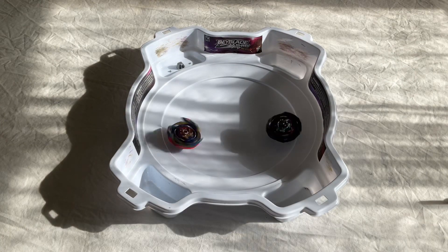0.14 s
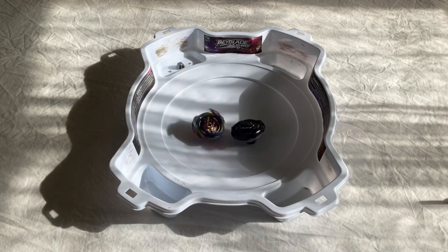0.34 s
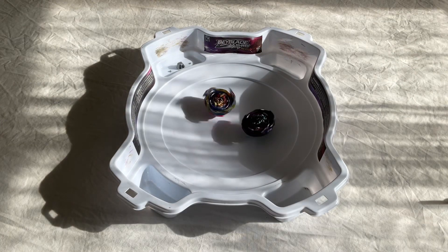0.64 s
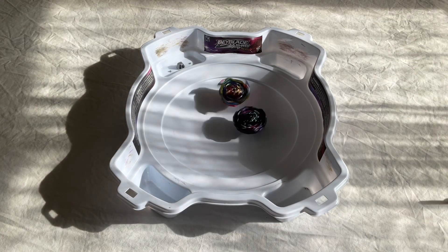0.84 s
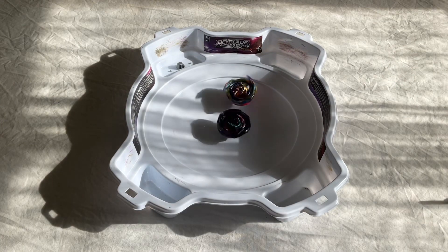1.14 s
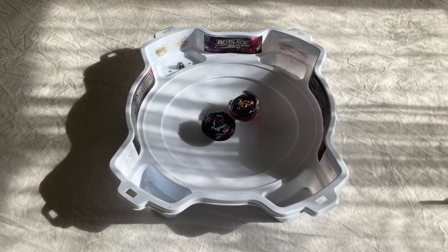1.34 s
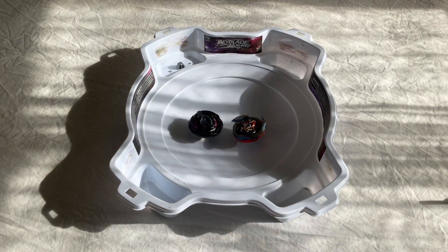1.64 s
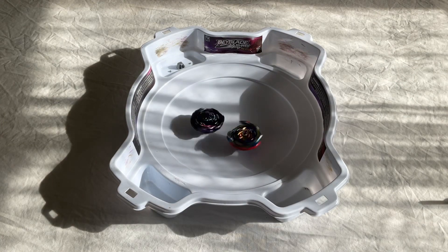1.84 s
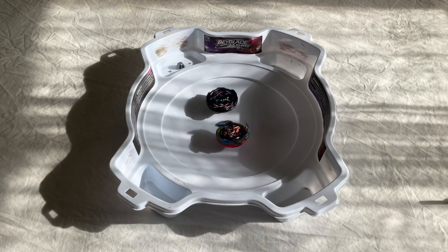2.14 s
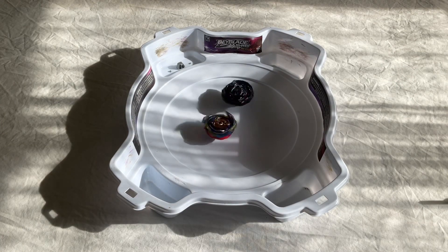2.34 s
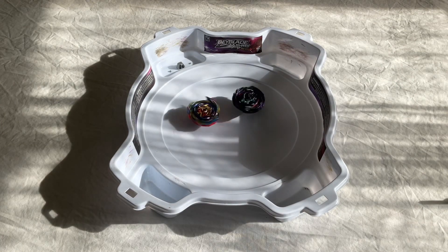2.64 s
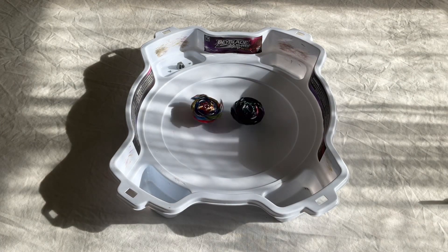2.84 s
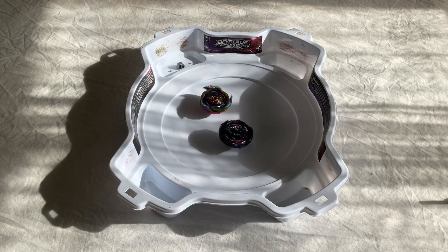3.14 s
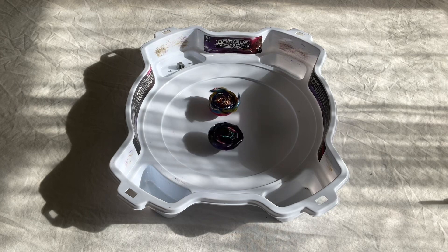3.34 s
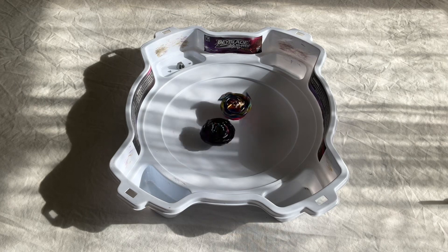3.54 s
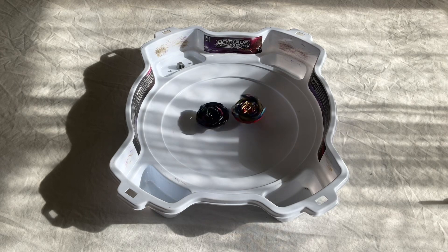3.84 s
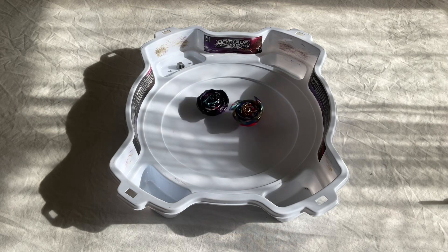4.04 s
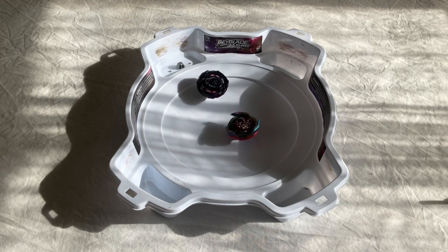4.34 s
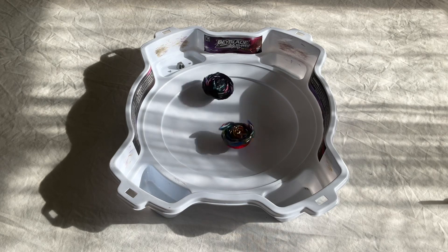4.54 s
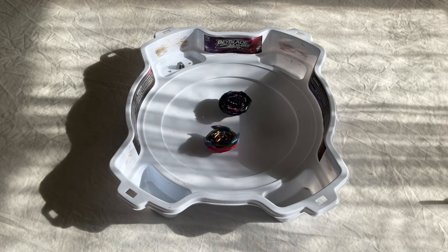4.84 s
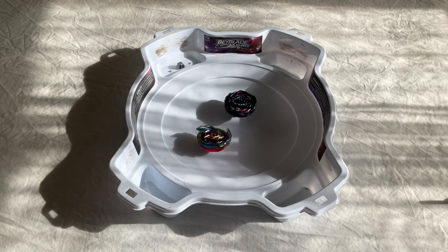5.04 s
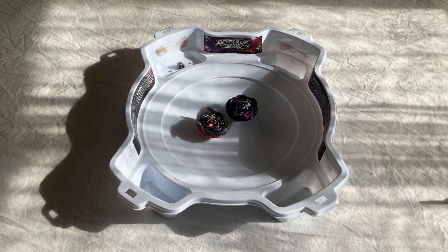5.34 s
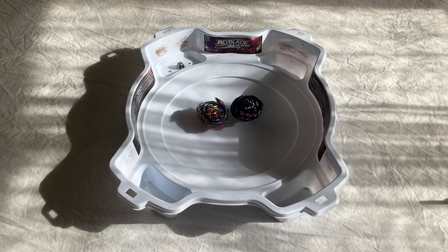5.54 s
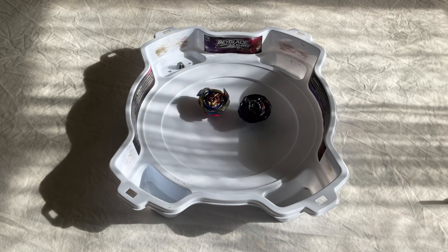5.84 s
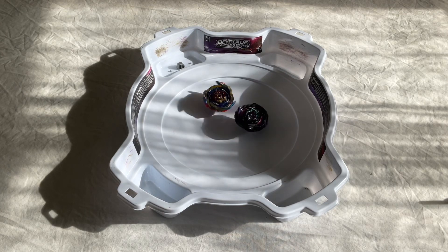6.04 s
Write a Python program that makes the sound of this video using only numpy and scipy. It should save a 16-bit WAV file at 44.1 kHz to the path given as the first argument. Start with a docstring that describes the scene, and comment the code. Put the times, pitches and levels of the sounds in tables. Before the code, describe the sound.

Close up in a small room, two toy tops spin in a thin plastic dish over a soft low rumble and hum. Hard, dry clacks come at irregular intervals, each followed by light knocks and quick rattling that settles into faint ticking. A few tiny squeaks and short scrapes slip between hits, and the loudest crack comes late, before a final cluster of clashes.

```python
"""A small room, close to a thin plastic dish in which two toy tops spin.
Their toothed rims clash in millisecond bursts of noise contacts that set off clacks, rings and dish thumps.
Shaken tops knock, chatter as trains of tiny hops, skid as resonant noise and squeak until they steady again.
Metal weight discs sing on in thin sine tones, and the dish floor booms as a top drops back.
Underneath, the dish rumbles as coloured noise, drones on a wavering low tone and whirrs on a fading one."""
import sys
import numpy as np
from scipy import signal
from scipy.fft import rfft, irfft
from scipy.io import wavfile
from scipy.ndimage import uniform_filter1d

SR = 44100
rng = np.random.default_rng(int(sys.argv[2]) if len(sys.argv) > 2 else 0)


def transcribe(signal):
    """Save signal, clipped to [-1, 1], as a 16-bit WAV file at the path in sys.argv[1]."""
    frames = np.atleast_2d(signal).T
    limited = np.clip(frames, -1, 1)
    pcm = np.round(limited * 32767).astype(np.int16)
    wavfile.write(sys.argv[1], SR, pcm)


N = 273420  # length in samples

# Levels in the tables are relative wherever a layer adds its own gain.
# rims clash: start_s, level_db, treble_db (-10 is neutral), thump_db, hold_ms, clack_hz
CLASHES = [(0.3477,-1.5,-9,-28.5,4.2,2080),(0.8076,-8,-2,-35,2.2,1850),(0.819,-7,-8,-40.5,2.3,3880),(1.262,-11,-4,-41.5,3.6,3080),(2.0129,-7.5,-5,-46,4.4,3320),(2.943,-17,-11,-38,10.4,2512),(2.9577,-7.5,-8,-38,4,2320),(3.9313,-14,-10,-47.5,1.9,3255),(4.184,-7.5,-11.5,-33.5,3.9,2976),(4.7725,0,-10,-29,6.8,3020),(5.3231,-5,-10.5,-27,1.4,2750),(5.3439,-9.5,-7,-37.5,3.8,3260),(5.3871,-10.5,-10,-42,2.4,2544),(5.5844,-8.5,-11.5,-33,2.5,3247),(6.0163,-11.5,-5,-34,3,2500),(6.0263,-8,-8.5,-33,3.2,3240)]
# knocks of a tilted top on the dish or the other top, hard and soft: start_s, level_db, treble_db (-14 is neutral)
KNOCKS = [(0.2039,-29,-27),(0.2744,-18,-13.5),(0.406,-10,-18),(0.5442,-21,-17),(0.6094,-31.5,-14),(0.711,-31.5,-18),(1.2755,-15.5,-18),(1.4076,-28.5,-16.5),(1.8291,-35.5,-25),(1.975,-32,-18),(2.055,-18.5,-18.5),(2.0967,-17.5,-15),(2.1172,-13.5,-17),(2.148,-16.5,-13),(2.1611,-20,-16),(2.2185,-25.5,-23),(2.25,-25,-24),(2.2752,-27,-30),(2.3006,-28,-17),(2.3738,-35,-21.5),(2.8884,-25.5,-20.5),(2.9834,-18.5,-12),(3.0343,-15.5,-19),(3.8834,-27,-14),(3.9832,-16.5,-13.5),(4.4233,-33.5,-17),(4.471,-29,-19),(4.7007,-17.5,-20),(4.7328,-15,-16),(4.7644,-18.5,-12.5),(4.8543,-22,-17),(5.1602,-35,-21.5),(5.6325,-20,-17),(5.8428,-32.5,-18.5),(5.8642,-33,-22),(6.103,-19.5,-14),(6.1267,-18,-12.5)]
# the tops are thrown off balance and chatter, building up to full_level_s:
# full_level_s, level_db, hold_s, rise_s (per 20 dB)
WOBBLES = [(0.3,-36.5,.12,.14),(0.5,-40,.04,.15),(0.81,-44.5,.04,.27),(1.275,-39,.02,.03),(1.835,-60,.07,.01),(2.025,-39,.135,.03),(2.83,-48,.06,.08),(2.96,-39,.075,.04),(3.95,-43,.02,.17),(4.68,-42.5,.07,.27),(5.35,-44,.05,.02),(5.6,-48,.06,.02),(6.04,-41,.16,.1)]
# light ticking of the tips while the tops stand upright: time_s, level_db
TICKING = [(0,-56),(1.2,-57.5),(1.6,-68),(2.4,-66),(3.4,-64.5),(3.72,-58.5),(4.12,-65),(4.5,-58),(5.05,-68.5),(5.85,-62.5)]
# a tip slides across the dish, building up to full_level_s:
# full_level_s, level_db, hold_s, rise_s (per 20 dB), fall_s (per 20 dB)
SLIDES = [(4.258,-34,.06,.065,.08),(4.63,-34,.075,.02,.04)]
# a tip squeaks on the plastic: start_s, level_db
SQUEAKS = [(1.1093, -31.5), (1.1521, -27.5), (3.3532, -42)]
# a metal weight disc is left singing: start_s, pitch_hz, level_db, t60_s
SINGING = [(0.819,5303,-56,0.95),(0.819,4296,-65,1.0),(4.773,8520,-58,.6),(4.773,4517,-64,.7),(5.584,4290,-62,.6)]
# a top drops back and the dish booms: start_s, pitch_hz, level_db
BOOMS = [(0.385,184,-31),(0.425,139,-29),(0.819,725,-29.5),(0.83,188,-35),(2.19,150,-31.5),(2.21,220,-38),(5.598,161,-36),(6.04,148,-40)]
# the tips roll over the dish: time_s, level_db
ROLL = [(0,-43),(1.1,-45),(2.3,-43.8),(3.35,-48),(6.2,-48.8)]
# low drone of the dish: time_s, level_db
DRONE = [(0.0, -50), (1.16, -53), (1.76, -41), (2.5, -45), (2.68, -41), (4.21, -49), (4.28, -56),
         (4.51, -45), (4.73, -52), (4.97, -39), (5.4, -48), (5.97, -42), (6.2, -49)]

# ringing modes of the tops: pitch_hz, level_db, t60_s
TOP_MODES = [(1140,-2,.05),(2048,1.5,.05),(2200,-4.5,0.093),(2540,-3.5,.05),(2900,-5,.06),(2994,-9.5,0.16),(3145,-1.5,0.088),(3420,2.5,0.071),(3508,-5.5,0.17),(3890,-7,.07),(4847,-6.5,.08),(6300,3,.06),(6910,-11.5,.06),(8100,-4,.05),(8550,7.5,.06),(8510,-2,.12)]
# resonances of a sliding tip: pitch_hz, width_hz, level_db
SKID_MODES = [(720, 160, -8), (3020, 200, 3.5), (3290, 130, 2.5), (4430, 220, 3.5), (4830, 260, 6),
              (5080, 200, -3), (8400, 700, -7)]
# spectral colours of clash, knock, chatter, dish thump and rolling: frequency_hz, level_db
CLASH_COLOUR = [(300, -17.5), (900, -12), (1400, -5.5), (2000, -4.5), (3100, 0.5), (4400, -1.5), (5600, -2),
                (7000, 1.5), (8400, 2), (10000, -3), (12500, -10), (16000, -14.5)]
KNOCK_COLOUR = [(150, 2), (500, -3.5), (900, -13), (1300, -3), (2200, -3.5), (3100, 6), (4200, -6.5),
                (6000, -2.5), (8400, -6), (10500, -6.5), (12000, -16), (16000, -18.5)]
CHATTER_COLOUR = [(200,-7),(500,-2.5),(730,-4),(950,-7),(1250,3),(1700,-1.2),(2200,1),(3100,1.5),(4200,-2.5),(5000,-2),(5800,-5.5),(8500,-2.5),(11000,-13),(15500,-21)]
THUMP_COLOUR = [(30,-40.5),(70,-21.5),(140,-3),(220,-1),(340,1.5),(450,-2.5),(560,-7.5),(730,-10),(920,-18),(1250,-16),(1700,-32),(4000,-57)]
ROLL_COLOUR = [(25,-50),(38,-24),(55,-7),(100,5.5),(140,-2),(220,-2),(340,-4.5),(450,-10.5),(700,-15),(1000,-20),(2000,-27),(4000,-42),(8000,-44),(15000,-68)]

SETTLE_S = 0.17  # a wobble dies away by 20 dB in this time
WHIRR_HZ, WHIRR_DB, WHIRR_FADE_DB_PER_S = 344, -45, 6
DRONE_HZ = 76.2
ROLL_CHATTER_SHARE = 0.1  # dB of extra rumble per dB of chatter
ROOM_T60_S, ROOM_TREBLE_T60_S = 0.17, 0.2
LOW_CUT_HZ, TOP_HZ = 42, 15800


def undb(db):
    """Decibels to gain."""
    return 10 ** (np.asarray(db) / 20)


def unit(x):
    """Scale to rms 1."""
    return x / np.sqrt(np.mean(x ** 2))


def unit_energy(x):
    """Scale to energy 1."""
    return x / np.sqrt(np.sum(x ** 2))


def curves(table):
    """The columns of a timed table, one value a sample."""
    s, *columns = np.transpose(table)
    return [np.interp(np.arange(N) / SR, s, column) for column in columns]


def seconds(length):
    """A time axis in seconds."""
    return np.arange(int(length * SR)) / SR


def add(track, s, sound):
    """Mix a sound in at time s."""
    i = max(int(s * SR), 0)
    track[i:i + len(sound)] += sound[:N - i]


def ring(x, response):
    """Drive an impulse response."""
    return signal.fftconvolve(x, response)[:len(x)]


def colour(points, tilt_db=0, size=4096):
    """Minimum-phase response with the given spectrum, tilted by tilt_db an octave above 2 kHz."""
    hz, db = np.transpose(points)
    octave = np.log2(np.maximum(np.arange(size // 2 + 1) * SR / size, 1))
    tilt = tilt_db * np.maximum(octave - np.log2(2000), 0)
    gain = undb(np.interp(octave, np.log2(hz), db) + tilt)
    # folding the cepstrum puts all the energy after the blow
    cepstrum = irfft(np.log(gain))
    cepstrum[1:size // 2] *= 2
    cepstrum[size // 2 + 1:] = 0
    return unit_energy(irfft(np.exp(rfft(cepstrum))))


def walk(rate):
    """Smooth random drift of rms 1, with a fresh value rate times a second."""
    k = int(SR / rate)
    steps = np.repeat(rng.standard_normal(N // k + 1), k)
    return unit(uniform_filter1d(uniform_filter1d(steps, k), k)[:N])


def swell(s, db, hold_s, rise_s, fall_s):
    """Gain that builds up to db at time s, holds and fades; rise and fall are times per 20 dB."""
    t = np.arange(N) / SR - s
    before, after = np.maximum(-t, 0), np.maximum(t - hold_s, 0)
    return undb(db - 20 * (before / rise_s + after / fall_s))


def contact(hold_ms, rise_ms, fall_ms, grain_db):
    """A burst of tiny impacts of uneven strength while two spinning surfaces touch."""
    ms = 1000 * seconds(.1)
    teeth = rng.standard_normal(len(ms)) * undb(grain_db * rng.standard_normal(len(ms)))
    attack = np.minimum(ms / rise_ms, 1)
    release = np.exp(-np.maximum(ms - hold_ms, 0) / fall_ms)
    return unit_energy(teeth * attack * release)


def mode(hz, t60):
    """One damped resonance: a sine that decays from envelope height 1."""
    t = seconds(.3)
    return np.sin(2 * np.pi * hz * t) * undb(-60 * t / t60)


def clashes(crack_db=13.0, clack_db=3, clack_t60=0.015, thump_db=27, thump_t60=0.09):
    """Rim teeth rattle across each other, the shell clacks, the tops ring, and the recoil thumps the dish."""
    out, t = np.zeros(N), seconds(.3)
    for s, db, treble_db, dish_db, hold_ms, clack_hz in CLASHES:
        burst = contact(hold_ms, rise_ms=0.61, fall_ms=2.16, grain_db=4.5)
        crack = unit_energy(ring(burst, colour(CLASH_COLOUR, tilt_db=.6 * (treble_db + 10))))
        add(out, s, undb(db + crack_db) * crack)
        clack = unit_energy(ring(burst, mode(clack_hz, clack_t60)))
        add(out, s, undb(db + clack_db) * clack)
        add(out, s + .001, undb(db) * top_ring())
        thump = ring(rng.standard_normal(len(t)) * undb(-60 * t / thump_t60), colour(THUMP_COLOUR))
        add(out, s + .002, undb(dish_db + thump_db) * unit_energy(thump))
    return out


def top_ring():
    """The modes of the tops; each blow lands elsewhere and weights them anew."""
    t = seconds(.7)
    hz, db, t60 = np.transpose(TOP_MODES)[:, :, None]
    weight, phase = rng.standard_normal((2, len(hz), 1))
    tones = np.sin(2 * np.pi * (hz * t + phase))
    # dividing by the root of the decay time sets each level by energy
    modes = tones * undb(db + 2.4 * weight - 60 * t / t60) / np.sqrt(t60)
    return unit_energy(modes.sum(0))


def knocks(chatter_db, knock_db=10, ring_db=-3):
    """Lighter, duller blows of a wobbling top: short noise contacts that also ring the tops."""
    out = np.zeros(N)
    for s, db, treble_db in [*KNOCKS, *stray_knocks(chatter_db)]:
        burst = contact(hold_ms=1.0, rise_ms=0.19, fall_ms=2.8, grain_db=3.0)
        knock = unit_energy(ring(burst, colour(KNOCK_COLOUR, tilt_db=0.642 * (treble_db + 14))))
        add(out, s, undb(db + knock_db) * knock)
        add(out, s, undb(db + ring_db) * top_ring())
    return out


def stray_knocks(chatter_db, rate=4, above_db=15, scatter_db=2.2, most_db=-32,
                 treble_db=-19, treble_scatter_db=4, count=80):
    """Now and then a top tips over far enough to knock lightly, its level following the chatter."""
    place, size, bright = rng.standard_normal((count, 3)).T
    times = (np.arange(count) + .5 + .3 * place) / rate
    chatter_then_db = np.interp(times * SR, np.arange(N), chatter_db)
    db = np.minimum(chatter_then_db + above_db, most_db) + scatter_db * size  # capped, then scattered
    return np.c_[times, db, treble_db + treble_scatter_db * bright][times < N / SR]


def unrest():
    """How hard the tips chatter, in dB: the powers of upright ticking and every wobble add up."""
    (upright_db,) = curves(TICKING)
    power = undb(upright_db) ** 2 + sum(swell(*wobble, SETTLE_S) ** 2 for wobble in WOBBLES)
    return 10 * np.log10(power)


def tips(chatter_db, soft_hz=3200, hard_db=-48):
    """The tips hop; light contact is duller than hard contact, so the treble follows the chatter."""
    sharp = hops(chatter_db)
    soft = signal.sosfilt(signal.butter(1, soft_hz, fs=SR, output="sos"), sharp)
    hardness = np.clip(0.78 + .025 * (chatter_db - hard_db), .2, 1)
    return undb(chatter_db) * (soft + hardness * (sharp - soft))


def hops(chatter_db, rate=175, jitter=.55, scatter_db=4.0, calm_db=4, busy_db=-42,
         place_db=4.0, rub_db=-9, count=2000, channels=8):
    """Each tip hops about once a turn, unevenly; every spot of the dish has its own colour; the tip rubs too."""
    gap, size = rng.standard_normal((count, 2)).T
    times = np.cumsum(np.exp(jitter * gap)) / rate  # the median gap is 1 / rate
    # a calm top ticks unevenly; a shaken one rattles evenly
    calm = np.clip((busy_db - np.interp(times * SR, np.arange(N), chatter_db)) / 20, 0, 1)
    sizes = undb((scatter_db + calm_db * calm) * np.clip(size, -2, 2))
    # the weight that the tips carry stays much the same over a few turns
    sizes /= np.sqrt(uniform_filter1d(sizes ** 2, size=11))
    spots = np.zeros((channels, N))
    for s, blow, spot in zip(times[times < N / SR], sizes, rng.integers(channels, size=count)):
        add(spots[spot], s, blow * contact(hold_ms=1.2, rise_ms=0.25, fall_ms=2.5, grain_db=0.5))
    hz, db = np.transpose(CHATTER_COLOUR)
    ticks = np.zeros(N)
    for spot in spots:
        spot_db = db + place_db * rng.standard_normal(len(hz))
        ticks += ring(spot, colour(np.c_[hz, spot_db]))
    rub = ring(rng.standard_normal(N), colour(CHATTER_COLOUR))
    return unit(unit(ticks) + undb(rub_db) * unit(rub))


def skid(hiss_db=2, rough_db=1.6, bright_db=3.5):
    """Dense slips of a sliding tip ring its resonances over a broad hiss."""
    t = seconds(.03)
    body = np.zeros(len(t))
    for hz, width, db in SKID_MODES:
        decay = np.sqrt(width) * np.exp(-np.pi * width * t)
        body += undb(db) * decay * np.sin(2 * np.pi * hz * t)
    slips, rub = rng.standard_normal((2, N)) * undb(rough_db * walk(300))
    hiss = ring(rub, colour(CHATTER_COLOUR, tilt_db=bright_db))
    scrape = unit(unit(ring(slips, body)) + undb(hiss_db) * unit(hiss))
    return sum(swell(*slide) for slide in SLIDES) * scrape


def squeaks(hz=5100, rise_s=0.0015, squeak_db=-8.5):
    """Short stick-slip chirps of a tip: sines with a jittering phase and a quick rise and fall."""
    out, t = np.zeros(N), seconds(.04)
    for s, db in SQUEAKS:
        phase = 2 * np.pi * hz * t + 0.1 * np.cumsum(rng.standard_normal(len(t)))
        envelope = t / rise_s * np.exp(1 - t / rise_s)
        add(out, s, undb(db + squeak_db) * envelope * np.sin(phase))
    return out


def singing(beat_hz=9, beat_share=.2):
    """Long thin decaying tones of the weight discs, throbbing as they turn."""
    out, t = np.zeros(N), seconds(1.2)
    for s, hz, db, t60 in SINGING:
        throb = 1 + beat_share * np.sin(2 * np.pi * (beat_hz * t + rng.random()))
        add(out, s, undb(db - 60 * t / t60) * throb * np.sin(2 * np.pi * hz * t))
    return out


def booms(ring_cycles=30, rise_cycles=1.2):
    """The thin floor of the dish swings under a landing top; higher booms die sooner."""
    out = np.zeros(N)
    for s, hz, db in BOOMS:
        swing = mode(hz, ring_cycles / hz)
        cycles = hz * np.arange(len(swing)) / SR
        add(out, s, undb(db) * swing * np.minimum(cycles / rise_cycles, 1))
    return out


def wavering_tone(hz):
    """A sine of rms 1 that follows a moving pitch."""
    return np.sqrt(2) * np.sin(2 * np.pi * np.cumsum(hz) / SR)


def dish(chatter_db, upright_db=-55, rumble_flutter_db=1.4, whirr_wander_hz=14):
    """Rolling tips shake the thin dish: a rumble, a low drone and the faster top's whirr, fading with its spin."""
    t, (drone_db,), (roll_db,) = np.arange(N) / SR, curves(DRONE), curves(ROLL)
    rolling_db = roll_db + ROLL_CHATTER_SHARE * (chatter_db - upright_db)
    rolling = rng.standard_normal(N) * undb(rumble_flutter_db * walk(60))
    rumble = unit(ring(rolling, colour(ROLL_COLOUR, size=16384)))
    drone = wavering_tone(DRONE_HZ + 0.28 * walk(12)) * undb(.8 * walk(14))
    whirr = wavering_tone(WHIRR_HZ + whirr_wander_hz * walk(140)) * undb(3.2 * walk(50))
    whirr_db = WHIRR_DB - WHIRR_FADE_DB_PER_S * t
    return undb(rolling_db) * rumble + undb(drone_db) * drone + undb(whirr_db) * whirr


def room(x, rim_db=-11, rim_t60=0.058, wall_db=-12.5, split_hz=6000):
    """Quick reflections from the rim of the dish and the short tail of the room, as decaying noise."""
    t = seconds(.6)
    near, far, far_treble = rng.standard_normal((3, len(t)))
    low = signal.sosfilt(signal.butter(2, split_hz, fs=SR, output="sos"), far)
    high = signal.sosfilt(signal.butter(2, split_hz, "high", fs=SR, output="sos"), far_treble)
    tail = low * undb(-60 * t / ROOM_T60_S) + 0.45 * high * undb(-60 * t / ROOM_TREBLE_T60_S)
    tail *= np.minimum(t / 0.015, 1)  # the tail builds up over 15 ms
    rim = near * undb(-60 * t / rim_t60) * (t > .002)
    return x + ring(x, undb(rim_db) * unit_energy(rim) + undb(wall_db) * unit_energy(tail))


def scene():
    """The tops sound in the room; the dish's hum and booms are added dry."""
    chatter_db = unrest()
    tops = clashes() + knocks(chatter_db) + tips(chatter_db) + skid() + squeaks() + singing()
    return (room(tops) + booms() + dish(chatter_db))[None]


def record(dry):
    """Drop the deepest bass, round the highest peaks and cut the extreme treble."""
    lean = signal.sosfilt(signal.butter(3, LOW_CUT_HZ, "high", fs=SR, output="sos"), dry)
    rounded = np.tanh(lean)
    return signal.sosfilt(signal.ellip(10, .2, 70, TOP_HZ, fs=SR, output="sos"), rounded)


dry = scene()
out = record(dry)
transcribe(out)
```